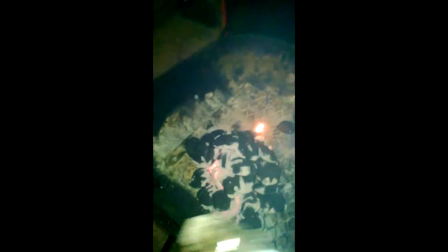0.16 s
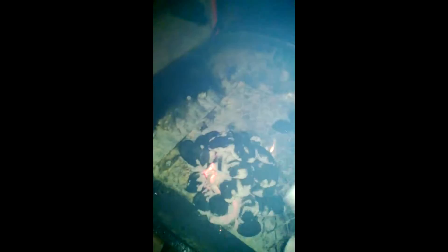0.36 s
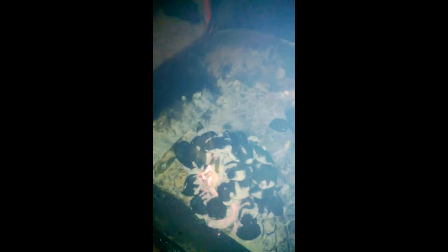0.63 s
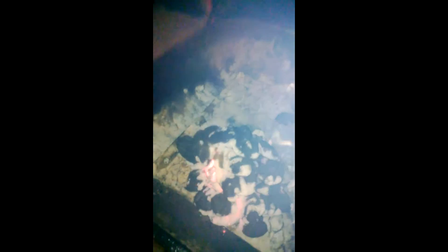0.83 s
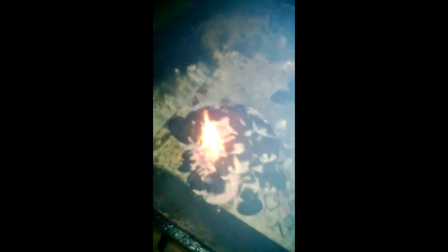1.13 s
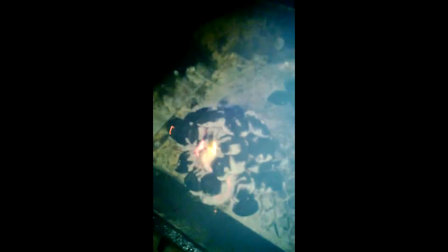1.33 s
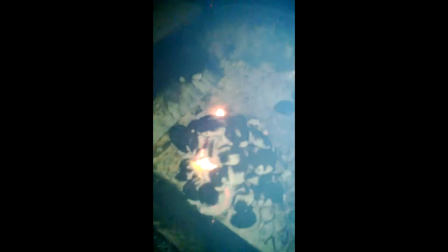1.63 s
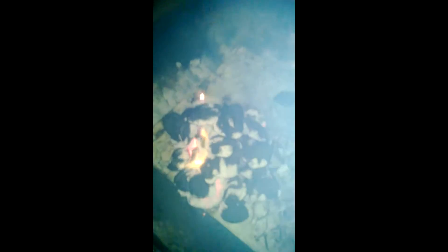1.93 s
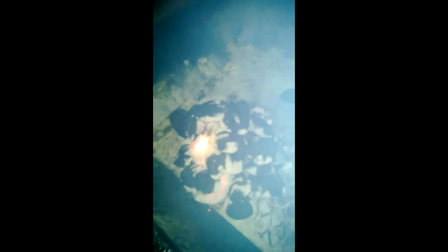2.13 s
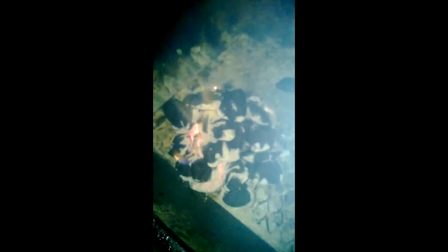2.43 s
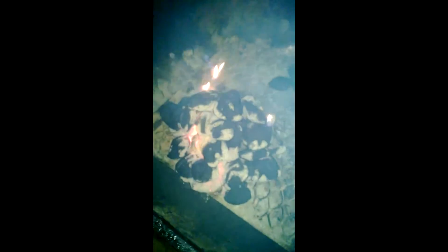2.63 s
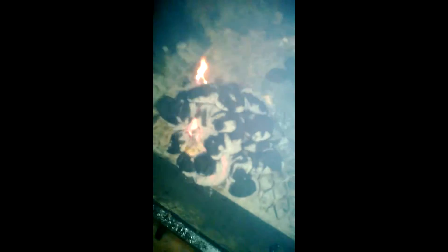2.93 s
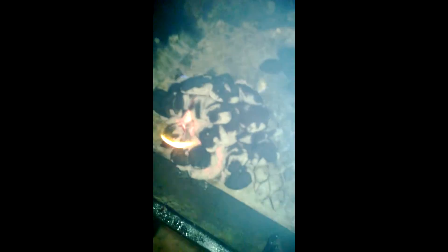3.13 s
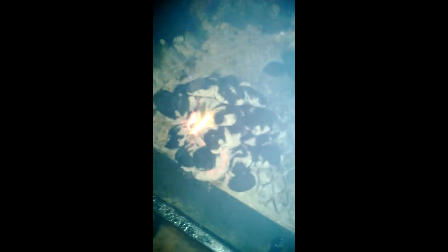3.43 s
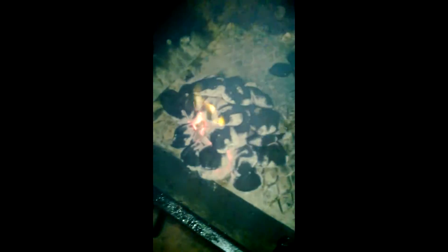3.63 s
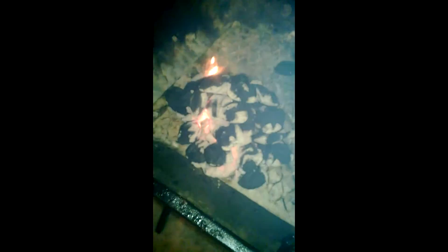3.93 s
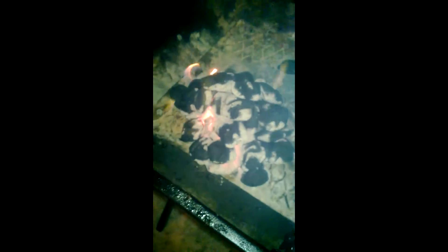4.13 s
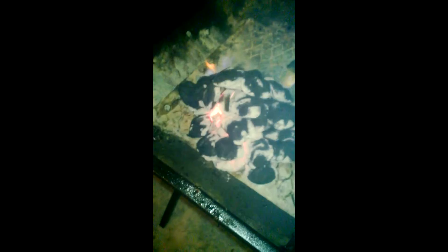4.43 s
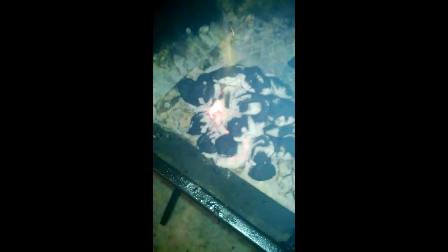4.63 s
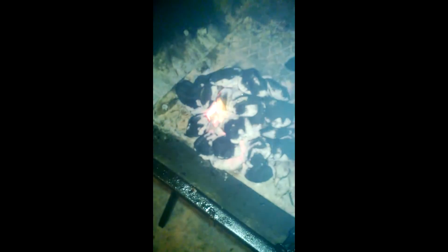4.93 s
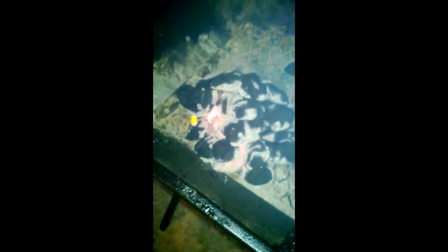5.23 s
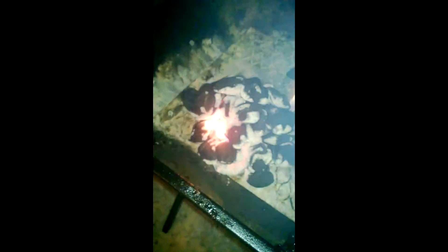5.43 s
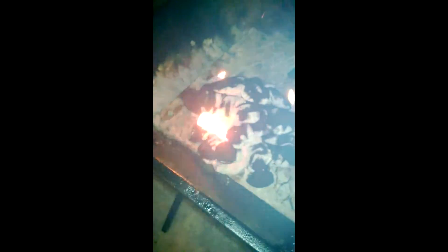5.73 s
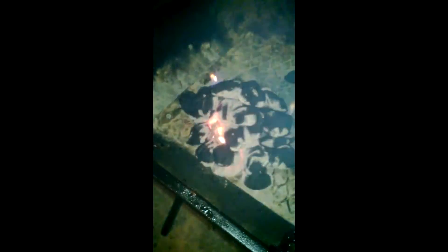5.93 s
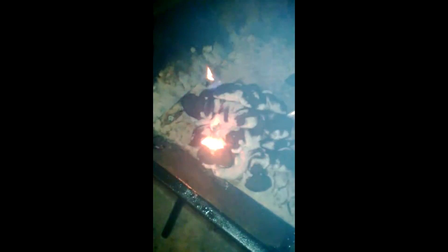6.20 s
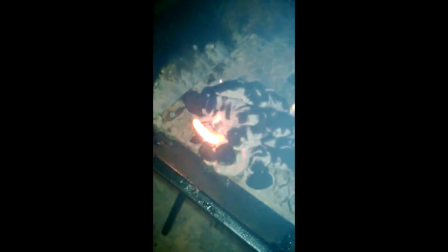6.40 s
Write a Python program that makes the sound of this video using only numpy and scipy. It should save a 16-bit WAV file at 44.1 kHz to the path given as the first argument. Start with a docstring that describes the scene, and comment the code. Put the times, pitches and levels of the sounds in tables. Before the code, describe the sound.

Outdoor grill coals give crisp bright clicks and gritty rustles, then faint shuffling and tiny ember ticks, amid low air thumps and handling bumps.

```python
"""Hiss, a far idling engine, buffeting air and a hand rubbing and knocking a microphone body run throughout,
while charcoal is stirred in a steel grill tray: lumps click, grit rustles, one lump drags, coal is shuffled
on the grate and small embers tick. Engine: wandering sine multiples. Air, hiss: shaped noise. Puffs: short
swings. Knocks: ringing pushes. Clicks: noise bursts through body modes, with echoes by band.
Rubbing, rustle, drag and shuffle: random ticks over friction noise, with modes for tray and grate."""
import sys
import numpy as np
from scipy import signal
from scipy.fft import rfft, irfft
from scipy.io import wavfile

SR = 44100
rng = np.random.default_rng(int(sys.argv[2]) if len(sys.argv) > 2 else 0)


def dump_mix(stems):
    """Bounce the given channels to the path in sys.argv[1] as a 16-bit WAV at rate SR."""
    frames = np.atleast_2d(stems).T  # one column per channel
    limited = np.clip(frames, -1, 1)  # hard clip at full scale
    pcm = np.round(limited * 32767).astype(np.int16)
    wavfile.write(sys.argv[1], SR, pcm)


N = 289296

# Hiss spectrum, scaled to HISS_DB rms: f/Hz, relative density/dB
HISS_COLOUR = [(200, 7), (400, -12), (700, -6.5), (1300, -5), (3000, -8), (8000, -11), (12000, -12),
               (16500, -9.5)]
# Engine partials: multiple of firing rate, rms level/dB before drift
ENGINE_PARTIALS = [(1, -55), (2, -57), (4, -60), (6, -62.5)]
# Buffeting air, low range: t/s, level/dB before drift
AIR_LEVEL = [(0.0, -48.5), (0.3, -36), (0.7, -52.5), (1.1, -33.5), (1.35, -48.5), (1.9, -40), (2.2, -52),
             (2.7, -53), (3.1, -49), (3.5, -50.5), (4.2, -46.5), (4.95, -48), (5.9, -51.5), (6.56, -48)]
# Air spectra, low and upper range: f/Hz, relative level/dB
AIR_LOW_COLOUR = [(18, 0.5), (30, 3.5), (45, -2.0), (70, -5), (110, -16.5)]
AIR_UPPER_COLOUR = [(90, -0.5), (130, 5.5), (200, 6.0), (270, 0.5), (340, -28.0), (700, -16.5)]
# Restless grip, as skin rubbing on the microphone body: t/s, level/dB before flicker
GRIP_LEVEL = [(0.0, -74.5), (0.6, -73), (0.95, -67), (1.3, -70), (1.9, -64.5), (2.2, -73.5), (2.5, -69),
              (3.0, -65), (3.2, -70.5), (3.7, -70), (3.93, -60), (4.2, -69.5), (5.1, -75.5), (5.6, -71),
              (5.9, -70.5), (6.1, -57.5), (6.3, -67), (6.56, -67.5)]
# Skin-rub spectrum: f/Hz, relative density/dB
RUB_COLOUR = [(250, -8.5), (450, 6.5), (700, -6), (1000, -9), (1600, -29)]
# Finger knocks on the microphone body: t/s, level/dB before trims, pitch f/Hz, relative rattle level/dB
KNOCKS = [(0.085, -49.5, 184, -7.5), (0.249, -38, 151, -19), (0.458, -39.5, 234, -10),
          (0.478, -34.5, 119, -16.5), (0.812, -26, 189, -14.5), (1.058, -31, 123, -27),
          (1.099, -43, 139, -10.5), (1.304, -38, 152, -24), (1.397, -45, 210, -9),
          (1.424, -34.5, 225, -9.5), (1.797, -29, 247, -7.5), (2.065, -40.5, 220, -12),
          (2.239, -33, 196, -17.5), (2.378, -39, 185, -20), (2.463, -34.5, 210, -23),
          (2.644, -40.5, 192, -13.5), (2.686, -35, 157, -24), (2.892, -36.5, 222, -15.5),
          (2.915, -29.5, 203, -19), (2.966, -36.5, 142, -18), (3.131, -40, 151, -13),
          (3.314, -40.5, 131, -11), (3.452, -35, 134, -26), (3.503, -37, 138, -29),
          (3.683, -43.5, 145, -20.5), (3.807, -38.5, 190, -11.5), (3.875, -37.5, 129, -18),
          (3.934, -36, 148, -18.5), (3.954, -32, 174, -25), (4.094, -41, 228, -15.5),
          (4.129, -38.5, 142, -20), (4.201, -48, 151, -8), (4.392, -41, 199.5, -16),
          (4.473, -41, 194, -25.5), (4.616, -35.5, 191, -22.5), (5.379, -41, 207, -22),
          (5.605, -39, 192, -20), (5.687, -50, 132, -6), (5.975, -40, 242, -16), (6.028, -38.5, 227, -12),
          (6.049, -35.5, 200, -21), (6.095, -41, 197, -20), (6.16, -35, 232, -28),
          (6.226, -33.5, 212, -20.5), (6.374, -33.5, 155, -17.5), (6.402, -39, 210, -21),
          (6.477, -39.5, 157, -18)]
# Air puffs on the port: crest t/s, envelope peak level/dB, f/Hz
PUFFS = [(0.11, -29.5, 50.5), (0.28, -16.5, 65.5), (0.338, -34, 48), (0.482, -29, 64), (0.943, -29, 44.2),
         (1.06, -21, 53), (1.109, -25, 47.5), (1.188, -33, 52.5), (1.291, -30.5, 49.6), (1.567, -27.5, 52),
         (1.616, -34, 48), (1.829, -32, 60), (1.93, -24.5, 45.4), (2.065, -29, 36), (3.46, -24.5, 64.4),
         (3.514, -28.5, 64.4), (3.548, -30, 74), (3.961, -32, 67), (4.05, -34, 50.9), (4.132, -30, 41),
         (6.302, -33, 44.1)]
# Lump clicks: t/s, level/dB before trim, low, lower-mid and top band relative level/dB, favoured f/Hz
# (bands as in ECHO_BANDS; its third band is the 0 dB reference)
CLICKS = [(0.4778, -45.5, -6, -4, -17, 5080), (0.5521, -26.5, -15, -5, -22, 5940),
          (0.7696, -29, -13.5, -1.5, -39, 6030), (0.7924, -46, -1, 12, -22, 4340),
          (0.8589, -29, -13, -3, -3, 4330), (0.8849, -31.5, -29, -9, -19, 5970),
          (1.0306, -38.5, -29, -22, -24, 6760), (1.1408, -25, -9.5, -0.5, -14, 6100),
          (1.4301, -23.5, -18, 0, -17, 4300), (1.4404, -34, -18, -7, -15, 5830),
          (1.4804, -24.5, -34, -6, -5, 6700), (1.4885, -15.5, -24, -2, -8.5, 4250),
          (1.6292, -37, -14, -4, 3, 6160), (1.6786, -41, -20, -13, -16, 7150),
          (1.7434, -33.5, -26, -15, -23, 7440), (2.0298, -23.5, -14, -1, -24, 6900),
          (2.0444, -27, -8.5, -2, -32, 5460), (2.2039, -15.5, -18.5, -9.5, -8, 7660),
          (2.3634, -31, -9, 0.5, -22, 5450), (2.374, -18, -29, -5, -10.5, 7800),
          (2.4857, -28, -11, -7.5, -10, 7850), (2.6354, -39, -4.5, -12, -19, 7300),
          (2.6504, -45, -16, -13, 5, 6700), (2.7506, -46.5, 3, 7, -20, 4950),
          (2.797, -44, -3, -8, -18, 7550), (2.9138, -9.5, -19.5, -4.5, -16, 4160),
          (3.0719, -27, -6, 3.5, -21, 4100), (3.1068, -15, -16, -12.5, -6, 6440),
          (3.1358, -15, -23, -1, -19, 5910), (3.1752, -20.5, -15.5, -8, -18, 6800),
          (3.2086, -29.5, -11.5, -4, -26, 6700), (3.2234, -44, -14, -7, -25, 5860),
          (3.3049, -19, -16, -5, -20, 6120), (5.0898, -44.5, -12, -4, -14, 6540),
          (5.3193, -44.5, -9, 4.5, -17, 4400), (5.4774, -39, -19, -19, -10, 6340),
          (5.5443, -53, -9, -10, -12, 6180), (5.6087, -40, -22, -17, -17, 6100),
          (5.6386, -38.5, -18, -12, -20, 6000), (5.7633, -42.5, -11, -19, -16, 5830),
          (5.8716, -47, -5, -15, -19, 6300), (6.1389, -42, -17, -10, -14, 7930),
          (6.2667, -46, -14, -21, -3, 6560), (6.5335, -42.5, -12, -16, -14, 6350)]
# Modes of lumps and tray: nominal f/Hz, relative level/dB, t60/s before the LONGEST_RING_S cap
BODY_MODES = [(2438, 0, .015), (2662, 21.5, 0.0058), (3420, 6.5, 0.0024), (4240, 6, 0.019),
              (4430, 5.5, 0.0064), (5263, 5, .008), (5960, -3, 0.029), (6607, 3.5, 0.02), (6920, -1, 0.017),
              (7460, 1.5, 0.037), (8425, -3, 0.006), (8790, -0.5, 0.015), (11000, -3, 0.012),
              (15200, -1, .005)]
# Tray and yard echoes: low edge f/Hz, high edge f/Hz, relative level/dB before build-up, t60/s
ECHO_BANDS = [(2051, 3180, -2, .2), (3180, 4720, -10.5, 0.28), (5020, 8600, -10, 0.3),
              (9490, 21000, -8.5, 0.22)]
# Grit sliding off stirred lumps: start t/s, length/s, level/dB before flicker
RUSTLES = [(0.6, .16, -64.5), (0.93, .05, -62), (1.01, .04, -61.5), (1.1, .04, -55.5), (1.34, .08, -58.5),
           (1.63, 0.042, -53.5), (1.7, 0.047, -57.5), (1.91, 0.25, -61.5), (2.62, .04, -56),
           (2.67, .12, -61.5), (2.8, .03, -56), (3.65, .02, -70), (3.7, .03, -66)]
# Grit spectrum: f/Hz, relative density/dB
GRIT_COLOUR = [(2500, -10.5), (4000, -12), (5200, -7), (6700, -4), (8000, -9.5), (9500, -20), (13000, -18)]
# Lump dragged over the steel tray, one list a spell: t/s, scrape level/dB, ring level/dB, before drift
DRAG_SPELLS = [
    [(1.62, -79, -85), (1.64, -60, -66), (1.69, -62, -79), (1.85, -60, -66.5), (1.92, -56.5, -66),
     (2.02, -60, -73)],
]
# Drag spectrum: f/Hz, relative density/dB
DRAG_COLOUR = [(900, -7), (1500, -2.5), (2400, 3), (3500, 3), (4500, -10)]
# Tray modes: f/Hz, width/Hz, level re ring curve/dB
TRAY_MODES = [(1241, 40, -10.5), (1790, 50, -4.5), (2450, 28, 2.5), (3167, 50, -8.5), (3840, 60, -7.5)]
# Coal shuffled on the grate: start t/s, length/s, scrape, ring and grit level/dB before drift
SHUFFLE_STROKES = [(5.085, 0.074, -63.5, -69, -66.5), (5.17, .04, -62.5, -69, -70),
                   (5.3, 0.097, -60, -64.5, -62), (5.48, 0.11, -67, -66.5, -77),
                   (5.6, 0.051, -62, -64.5, -73), (5.76, .03, -70, -75, -79), (5.87, .04, -71, -77, -69),
                   (5.955, 0.067, -61.5, -69, -69), (6.02, 0.063, -68, -68, -74),
                   (6.13, 0.027, -67, -83, -73), (6.28, 0.071, -83, -84, -71.5), (6.45, .11, -74, -89, -67)]
# Shuffle spectrum: f/Hz, relative density/dB
SHUFFLE_COLOUR = [(350, -6), (700, -3.5), (1400, 3.5), (2200, 0.5), (3500, -4.5), (4500, -13.5)]
# Grate modes: f/Hz, width/Hz, level re ring curve/dB
GRATE_MODES = [(400, 30, -2), (592, 40, -1), (1190, 70, 0), (1830, 80, -8)]

HISS_DB, ENGINE_HZ, CUTOFF_HZ = -63.5, 31.46, 16300
# upper air: level before drift at the reference grip; dB per dB of grip
STIR_DB, STIR_GRIP_REF_DB, STIR_DB_PER_DB = -55.5, -67, 0.55
CONTACT_S, CONTACT_RISE_S = 0.012, 0.0022   # knock rattle decay and rise
# chatter decay at the reference click level; exponential growth per dB
CHATTER_S, CHATTER_REF_DB, CHATTER_PER_DB = 0.0033, -29.5, 0.0827
FIRST_BLOW_GAIN, FIRST_BLOW_S = 1.7, 0.001   # extra strength of first contacts, its decay
MODE_SHIFT, LONGEST_RING_S = 0.04, 0.025   # common mode shift (+-share), t60 cap
ECHO_RING_DB, SPIT_SPREAD_DB, SPIT_S = -4, 0.5, 0.002   # spit: uneven echo level, step length
CLICK_TRIM_DB = -11.5
EMBERS_FROM_S, EMBERS, EMBER_DB = 5.0, 14, -55   # level before CLICK_TRIM_DB, +-2.5 dB
EMBER_LOW_DB, EMBER_MID_DB, EMBER_TOP_DB = -15, -9, -14
RISE_DB_PER_S, FALL_DB_PER_S, SILENT_DB = 616, 259, -95


def from_db(db):
    """Decibels to gain."""
    return 10 ** (np.asarray(db) / 20)


def rms_one(x):
    """Scale to unit rms."""
    return x / np.sqrt(np.mean(x ** 2) + 1e-20)


def in_time(rows):
    """Interpolate the columns of a t/s table, one value a sample."""
    t_s, *columns = np.transpose(rows)
    return [np.interp(np.arange(N) / SR, t_s, column) for column in columns]


def coloured(x, points):
    """Filter to a (f/Hz, dB) spectrum, 60 dB down two octaves past its ends; unit rms."""
    hz, level_db = np.transpose(points)
    hz = np.r_[hz[0] / 4, hz, hz[-1] * 4]
    level_db = np.r_[level_db[0] - 60, level_db, level_db[-1] - 60]
    bin_hz = np.arange(N // 2 + 1) * SR / N
    gain = from_db(np.interp(np.log(bin_hz + 1), np.log(hz), level_db))
    return rms_one(irfft(rfft(x) * gain, N))


def drift(corner_hz):
    """Slow unit-rms chance: noise twice through a one-pole low-pass at SR / 40."""
    r = np.exp(-80 * np.pi * corner_hz / SR)
    noise = rng.standard_normal(N // 40 + 2002)
    slow = signal.lfilter([1], [1, -2 * r, r * r], noise)[2000:]   # drop the settling
    return np.interp(np.arange(N) / 40, np.arange(len(slow)), rms_one(slow))


def ring(x, hz, t60_s):
    """Two-pole resonator: a unit click starts a decaying sine of height 1."""
    r, w = from_db(-60 / (t60_s * SR)), 2 * np.pi * hz / SR
    return signal.lfilter([0, np.sin(w)], [1, -2 * r * np.cos(w), r * r], x + 1e-18)


def add(out, t_s, sound, level_db):
    """Mix a sound in place at its time and gain."""
    i = round(t_s * SR)
    out[i:i + len(sound)] += from_db(level_db) * sound[:N - i]


def spells(tables):
    """Level curves/dB of spells, ramped to SILENT_DB 30 ms outside each."""
    def silent(row, lag_s):
        return (row[0] + lag_s, *[SILENT_DB] * (len(row) - 1))

    points = []
    for rows in tables:
        points += [silent(rows[0], -0.03), *rows, silent(rows[-1], 0.03)]
    return in_time(points)


def strokes(rows):
    """Level curves/dB of strokes: each swells, holds for its length and dies away."""
    start_s, length_s, *levels_db = np.transpose(rows)[:, :, None]
    t = np.arange(0, N / SR, 0.002)
    rise_db = -RISE_DB_PER_S * np.maximum(start_s - t, 0)
    fall_db = -FALL_DB_PER_S * np.maximum(t - start_s - length_s, 0)
    loudest = [(db + rise_db + fall_db).max(axis=0) for db in levels_db]
    return [np.interp(np.arange(N) / SR, t, curve) for curve in loudest]


def grit(spectrum, level_db, per_s, grain_db, flicker_db, modes=(), ring_db=SILENT_DB):
    """Sliding grains: uneven random ticks over friction noise, ringing what they slide on."""
    size_db = grain_db * np.minimum(rng.exponential(1, N), 4)
    ticks = (rng.random(N) < per_s / SR) * rng.standard_normal(N) * from_db(size_db)
    friction = rms_one(ticks) + rng.standard_normal(N)
    sound = from_db(level_db + flicker_db * drift(23)) * coloured(friction, spectrum)
    for hz, width_hz, db in modes:   # each mode's level drifts separately
        mode_gain = from_db(ring_db + db + 2.5 * drift(7.1))
        t60_s = np.log(1000) / np.pi / width_hz
        sound = sound + mode_gain * rms_one(ring(friction, hz, t60_s))
    return sound


def hiss():
    """Electronics noise: steady, spectrally shaped."""
    return from_db(HISS_DB) * coloured(rng.standard_normal(N), HISS_COLOUR)


def engine():
    """Low multiples of an idling firing rate that wanders a little."""
    rate_hz = ENGINE_HZ * (1 + 0.014 * drift(1.5))
    phase = 2 * np.pi * np.cumsum(rate_hz) / SR
    out = np.zeros(N)
    for k, db in ENGINE_PARTIALS:
        out += np.sqrt(2) * from_db(db + 3.15 * drift(8.0)) * np.sin(round(k) * phase + k)
    return out


def air(grip_db):
    """Lumpy turbulence in two ranges; the upper one follows the grip level."""
    low_db = in_time(AIR_LEVEL)[0] + 2.8 * drift(4.3)
    upper_db = STIR_DB + STIR_DB_PER_DB * (grip_db - STIR_GRIP_REF_DB) + 4.2 * drift(60)
    low = coloured(rng.standard_normal(N), AIR_LOW_COLOUR)
    upper = coloured(rng.standard_normal(N), AIR_UPPER_COLOUR)
    return from_db(low_db) * low + from_db(upper_db) * upper


def skin_rub(grip_db):
    """Skin slides on the microphone body in sparse uneven grains."""
    return grit(RUB_COLOUR, grip_db, per_s=300, grain_db=3.5, flicker_db=3.0)


def knocks(cycles):
    """A soft push rings the case at a low pitch; the rough contact rattles above it."""
    out, t = np.zeros(N), np.arange(3072) / SR
    upper = signal.butter(2, [350, 1050], "band", fs=SR, output="sos")
    press = 1.64 * (1 - np.exp(-t / CONTACT_RISE_S)) * np.exp(-t / CONTACT_S)
    for t_s, level_db, hz, rattle_db in KNOCKS:
        push = np.sin(np.pi * np.minimum(t * hz, 1)) * np.sin(2 * np.pi * hz * t)
        thud = ring(push, hz, cycles / hz)
        add(out, t_s, thud / np.abs(thud).max() * rng.choice([-1, 1]), level_db + 0.5)
        rough = rng.standard_normal(len(t))
        rattle = signal.sosfilt(upper, rough) + 0.063 * signal.lfilter([0.2], [1, -0.8], rough)
        add(out, t_s, press * rms_one(rattle), level_db + rattle_db - 2.0)
    return out


def puffs(cycles):
    """Each puff swings the membrane under a short Gaussian envelope, at random phase."""
    out, t = np.zeros(N), np.arange(-4096, 4096) / SR
    for crest_s, peak_db, hz in PUFFS:
        envelope = np.exp(-(t * hz / cycles) ** 2)
        swing = envelope * np.cos(2 * np.pi * (hz * t + rng.random()))
        add(out, crest_s + t[0], swing, peak_db)
    return out


def clicks(crack_db, spread_db, favour_db, build_up_s):
    """Uneven micro-contacts crack and ring the body; diffuse echoes swell, then die by band."""
    out, t = np.zeros(N), np.arange(12288) / SR
    bands = [signal.butter(3, row[:2], "band", fs=SR, output="sos") for row in ECHO_BANDS]
    build_up = 1 - np.exp(-t / build_up_s)
    fades = [from_db(db - 60 * t / t60_s) * build_up for _, _, db, t60_s in ECHO_BANDS]
    mode_hz = np.array(BODY_MODES)[:, 0]
    for t_s, level_db, low_db, mid_db, top_db, pitch_hz in [*CLICKS, *embers()]:
        chatter_s = CHATTER_S * np.exp(CHATTER_PER_DB * (level_db - CHATTER_REF_DB))
        spit_db = np.interp(t / SPIT_S, np.arange(200), rng.standard_normal(200))
        spit = from_db(SPIT_SPREAD_DB * spit_db)
        force = np.exp(-t / max(chatter_s, 5e-4)) + FIRST_BLOW_GAIN * np.exp(-t / FIRST_BLOW_S)
        contacts = rng.standard_normal(len(t)) ** 3 * force
        # two rows: the touch, and its scattered echoes
        drive = np.array([rms_one(contacts), rng.standard_normal(len(t))])
        # each click favours the modes near its pitch
        near = np.exp(-(np.log(mode_hz / pitch_hz) / 0.051) ** 2)
        strengths = from_db(spread_db * rng.standard_normal(len(mode_hz)) + favour_db * near)
        # a separate random shift moves all its modes together
        shift = 1 + MODE_SHIFT * rng.uniform(-1, 1)
        rung = np.zeros_like(drive)
        for strength, (hz, db, t60_s) in zip(strengths, BODY_MODES):
            rung += strength * from_db(db) * ring(drive, hz * shift, min(t60_s, LONGEST_RING_S))
        sound = rms_one(rung) * from_db([[0], [ECHO_RING_DB]]) + from_db(crack_db) * drive
        for band, fade, part_db in zip(bands, fades, [low_db, mid_db, 0, top_db]):
            touch, echoes = signal.sosfilt(band, sound)
            touch = rms_one(touch) * np.sqrt(2 * chatter_s / t[-1])
            echoes = fade * rms_one(spit * echoes)
            add(out, t_s, touch + echoes, level_db + part_db + CLICK_TRIM_DB)
    return out


def rustle(shuffle_grit_db):
    """Dense fine grit slides off stirred lumps and, later, with the shuffled coal."""
    level_db = np.maximum(strokes(RUSTLES)[0], shuffle_grit_db)
    return grit(GRIT_COLOUR, level_db, per_s=2100, grain_db=2.0, flicker_db=3.5)


def drag():
    """A lump dragged over the steel tray scrapes and excites its modes."""
    scrape_db, ring_db = spells(DRAG_SPELLS)
    return grit(DRAG_COLOUR, scrape_db, per_s=1800, grain_db=2.0, flicker_db=0.7,
                modes=TRAY_MODES, ring_db=ring_db)


def embers():
    """Click rows for faint ember ticks at random moments, levels and pitches."""
    rows = []
    for when, loud, pitch in rng.random((EMBERS, 3)):
        t_s = EMBERS_FROM_S + when * (N / SR - EMBERS_FROM_S)
        level_db = EMBER_DB + 5 * (loud - 0.5)
        rows.append((t_s, level_db, EMBER_LOW_DB, EMBER_MID_DB, EMBER_TOP_DB, 5500 + 2300 * pitch))
    return rows


def shuffle(scrape_db, ring_db):
    """Coal shuffled stroke by stroke scrapes the grate and excites its modes."""
    return grit(SHUFFLE_COLOUR, scrape_db, per_s=440, grain_db=2.5, flicker_db=1.9,
                modes=GRATE_MODES, ring_db=ring_db)


def scene():
    """Sum the steady background, air, hand and coal into one channel."""
    grip_db, = in_time(GRIP_LEVEL)
    scrape_db, ring_db, shuffle_grit_db = strokes(SHUFFLE_STROKES)
    background = hiss() + engine() + air(grip_db)
    hand = skin_rub(grip_db) + knocks(cycles=6.3)
    port = puffs(cycles=0.51)
    coal = clicks(crack_db=1.5, spread_db=0.5, favour_db=7.5, build_up_s=0.002)
    coal = coal + rustle(shuffle_grit_db) + drag() + shuffle(scrape_db, ring_db)
    return (background + hand + port + coal)[None]


def record(dry):
    """Steep low-pass: 60 dB down from CUTOFF_HZ up."""
    return signal.sosfilt(signal.cheby2(12, 60, CUTOFF_HZ, fs=SR, output="sos"), dry)


dry = scene()
out = record(dry)
dump_mix(out)
```